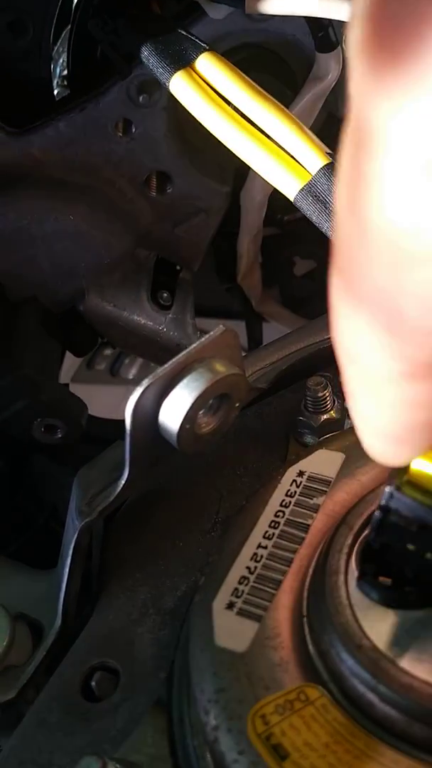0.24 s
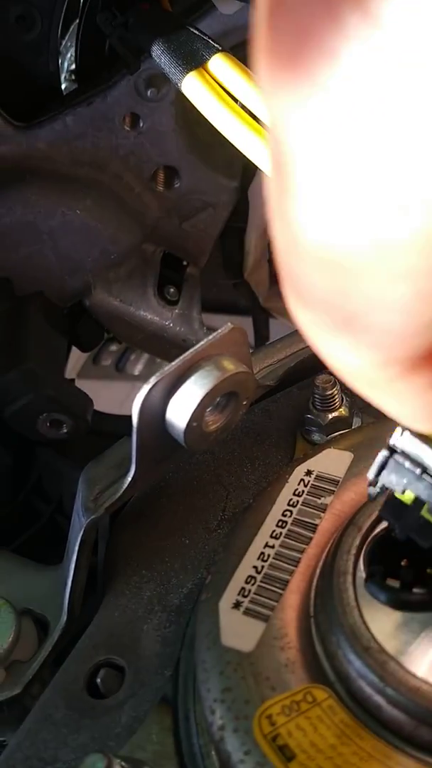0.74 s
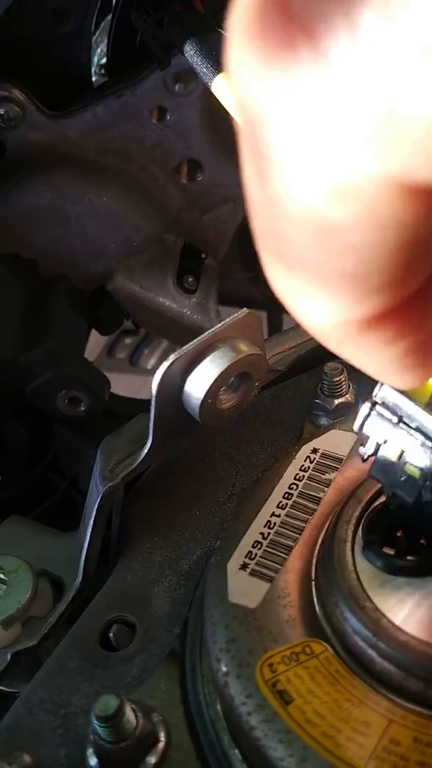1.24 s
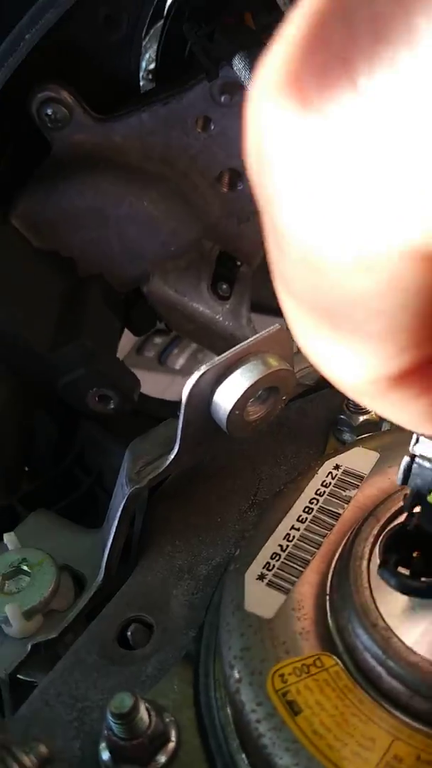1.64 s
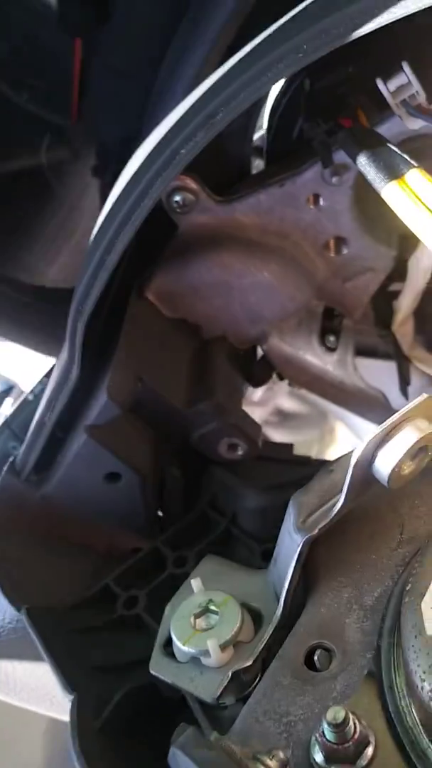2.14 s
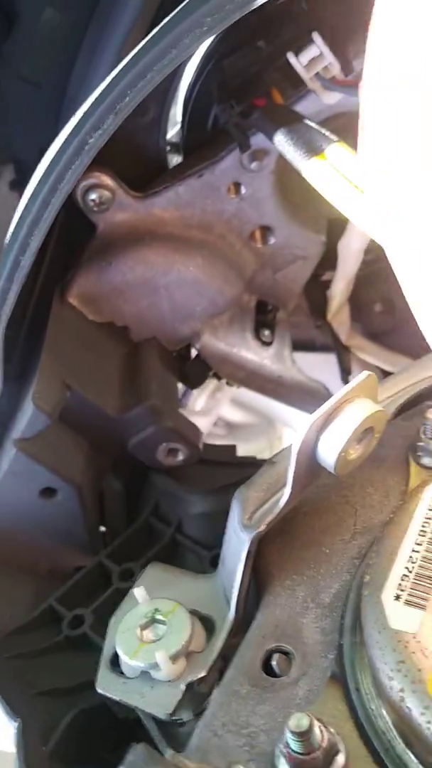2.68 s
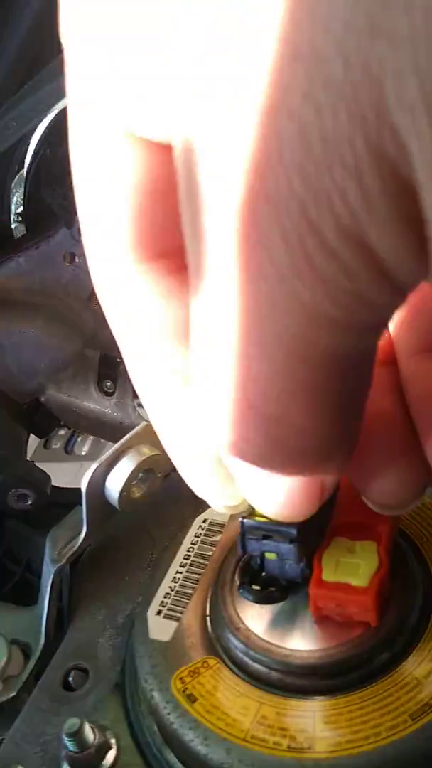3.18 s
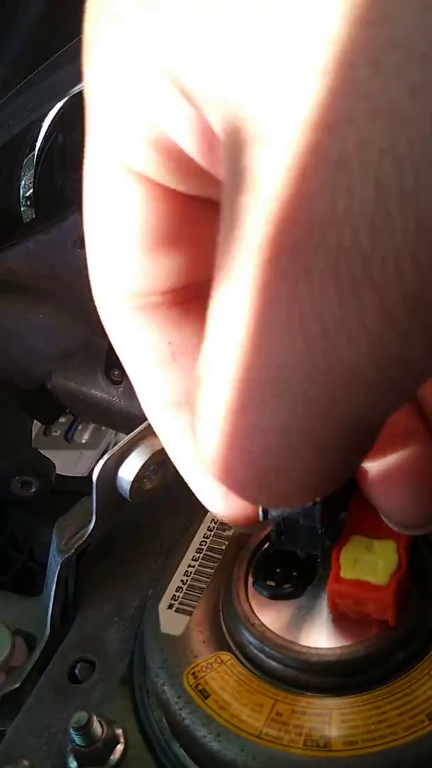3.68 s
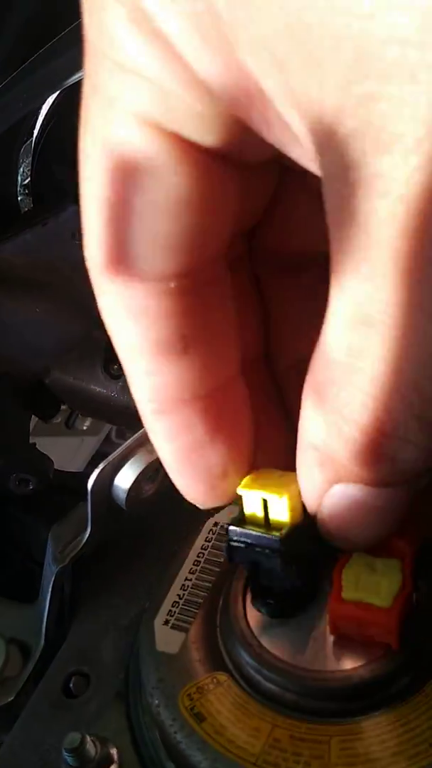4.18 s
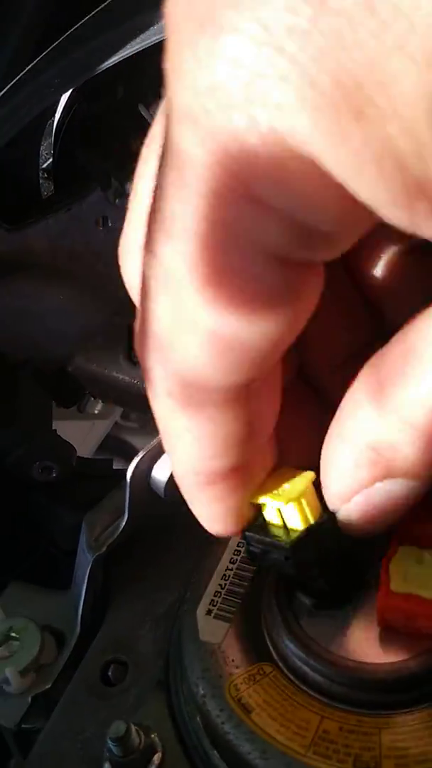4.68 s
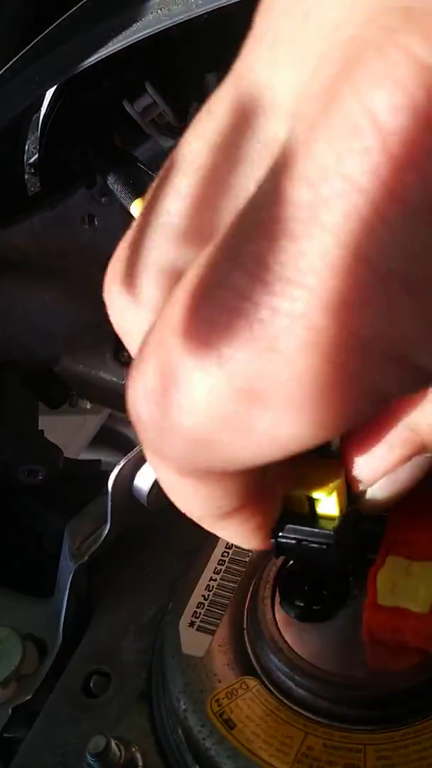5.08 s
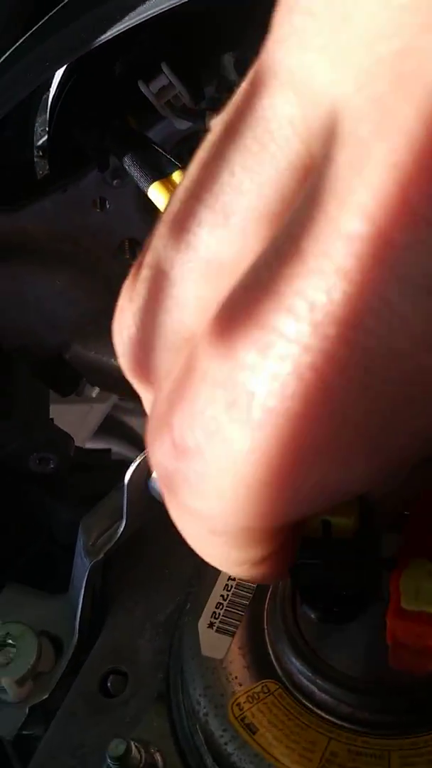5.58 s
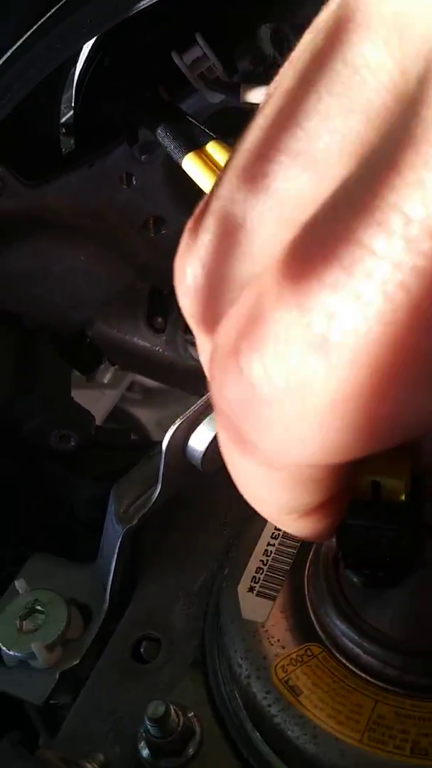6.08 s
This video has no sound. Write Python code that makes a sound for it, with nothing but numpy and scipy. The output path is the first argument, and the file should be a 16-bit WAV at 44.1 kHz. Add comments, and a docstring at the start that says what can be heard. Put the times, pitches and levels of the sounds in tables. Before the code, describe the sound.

In a still, padded car interior, small plugs are fitted by hand. Sparse bright ticks come first, then a busier cluster of clicks, dull knocks and dragging rustle, and later a crisp latch snapping home in two quick stages. Another strong click follows before the handling thins out. Close, dry pickup with a low room hush, a few faint distant chirps and a low engine drone swelling late.

```python
"""A hand fits small plastic plugs into the sockets of a steel housing in a parked car, close to the microphone.
Plugs tick as short bursts of slips that ring plastic shell and housing; a latch snaps home in two stages.
Wires knock as damped resonances; hand and cable sleeve rustle and squeak as shaped noise.
Behind them lie a few faint falling chirps (gliding sines), the quiet cabin (coloured noise)
and a far engine that swells near the end (narrow noise bands)."""
import sys
import numpy as np
from scipy import signal
from scipy.fft import rfft, irfft, next_fast_len
from scipy.io import wavfile

SR = 44100
rng = np.random.default_rng(int(sys.argv[2]) if len(sys.argv) > 2 else 0)


def materialize(psi):
    """Save the field psi as 16-bit PCM at rate SR to the path in sys.argv[1].

    A 1-D psi becomes a single channel; in a 2-D psi each row is a channel.
    """
    bounded = np.clip(np.atleast_2d(psi).T, -1, 1)
    quanta = np.round(bounded * 32767).astype(np.int16)
    wavfile.write(sys.argv[1], SR, quanta)


N = 279153   # samples
TIME = np.arange(N) / SR   # s
LOCAL = np.arange(-int(.04 * SR), int(.12 * SR)) / SR   # s around the zero moment of one blow
BLOW_SAMPLES = .004 * SR


def from_db(db):
    """Decibels to gain."""
    return 10 ** (np.asarray(db) / 20)


def rms_one(x):
    """Scale a steady sound to rms 1."""
    return x / np.sqrt(np.mean(x ** 2) + 1e-20)


def unit_blow(x):
    """Scale a blow to the energy of 4 ms at rms 1."""
    return x * np.sqrt(BLOW_SAMPLES / (np.sum(x ** 2) + 1e-20))


def coloured(x, spectrum):
    """Give a steady excitation a spectrum, joined up along log frequency; rms 1."""
    hz, db = np.transpose(spectrum)
    size = next_fast_len(len(x))
    grid = np.maximum(np.fft.rfftfreq(size, 1 / SR), 1)
    gain = from_db(np.interp(np.log(grid), np.log(hz), db))
    return rms_one(irfft(rfft(x, size) * gain, size)[:len(x)])


def resonance(x, hz, width_hz):
    """Two-pole resonance with gain 1 on top."""
    r = np.exp(-np.pi * width_hz / SR)
    feedback = [1, -2 * r * np.cos(2 * np.pi * hz / SR), r * r]
    return signal.lfilter(np.array([1, 0, -1]) * (1 - r * r) / 2, feedback, x)


def ring_width(t60):
    """Width in Hz of a resonance that dies away by 60 dB in t60 seconds."""
    return np.log(1000) / (np.pi * t60)


def bell(x, hz, width_hz, gain_db):
    """Raise or lower one band."""
    a = from_db(gain_db / 2)
    q = np.sin(np.pi * width_hz / SR)
    c = -2 * np.cos(2 * np.pi * hz / SR)
    return signal.lfilter([1 + q * a, c, 1 - q * a], [1 + q / a, c, 1 - q / a], x)


def drift(rate):
    """Random wander with rms 1, passing through `rate` new values a second."""
    knots = rng.standard_normal(N // 10)
    return rms_one(np.interp(TIME * rate, np.arange(len(knots)), knots))


def add(track, s, sound):
    """Lay a short sound into a track with its zero moment at s."""
    at = np.arange(len(sound)) + int(round((s + LOCAL[0]) * SR))
    inside = (at >= 0) & (at < N)
    track[at[inside]] += sound[inside]


def contact(rise_s, fall_s):
    """Force of a contact: it builds while the parts slide and collapses once they let go."""
    return np.exp(-np.abs(LOCAL) / np.where(LOCAL < 0, rise_s, fall_s))


def slips(size, spread_db):
    """Dense tiny slips of uneven size."""
    uneven = np.clip(rng.standard_normal(size), -2, 2)
    return rng.standard_normal(size) * from_db(spread_db * uneven)


# The more a slide damps the shell, the more of its scrape is heard.
CRACK_DB_PER_DOUBLING = 0.5

# Plug contacts. Each row: time in seconds, level in dB, housing share in dB, slide-in in seconds,
# main shell mode in Hz, second shell mode in Hz.
PLUG_CONTACTS = [ (0.0918, -43, -5, 0.0011, 5740, 7170), (0.1320, -52.5, -5.5, 0.0035, 6300, 10000),
                 (0.2210, -55.5, -4.5, 0.0015, 4670, 7450), (0.2256, -50, -9.5, .0012, 4900, 9070),
                 (0.4151, -57, 0.5, 0.0074, 3460, 7400), (0.7448, -47, -9.5, .0017, 6200, 7160),
                 (0.7560, -42, -16, .0034, 6400, 7140), (1.5950, -57.5, -5, 0.0025, 6570, 11000),
                 (2.0015, -50, -4, 0.0022, 8220, 8500), (2.1142, -33.5, -9.5, 0.0083, 6550, 8300),
                 (2.1215, -43, 0, 0.00069, 7260, 9500), (2.2, -52.5, 0.5, 0.0019, 7900, 8300),
                 (2.4077, -39, -4, 0.00052, 4050, 4800), (2.5196, -47, 1, 0.0023, 7960, 9100),
                 (2.8800, -45.5, -8, 0.0056, 6400, 8300), (2.981, -52, -6, .0014, 6300, 8800),
                 (3.091, -53.5, -11, 0.0016, 7340, 8800), (3.4223, -30, -19, 0.0013, 6200, 9060),
                 (3.7858, -50.5, -11, .0050, 8140, 9000), (3.9953, -54.5, -9, 0.0032, 6550, 8400),
                 (4.055, -55, -1.5, 0.0062, 7260, 8740), (4.164, -60, -5, .0012, 10000, 11100),
                 (4.217, -58, -5, .0070, 8300, 10500), (4.2845, -38, -11.5, 0.001, 7650, 8620),
                 (4.7290, -32, -16, 0.00086, 6300, 4950), (4.8933, -61, -3, .0010, 8900, 10200),
                 (5.118, -65, -18, .0011, 8400, 13000), (5.1994, -46, -15, 0.001, 7300, 8100)]

# Broadband crack of a plastic contact. Each row: frequency in Hz, relative level in dB per Hz.
CRACK_SPECTRUM = [(200, -11.5), (1000, -17), (2600, -20.5), (4300, -3), (5600, 3.5), (6600, 11),
                  (9000, 2.5), (12000, 3), (16000, -6.5)]


def plugs(fall_s, shell_width_hz, main_db, second_db, crack_db, damping_slide_s):
    """Each contact is a burst of slips: heard as a crack, as two plastic shell modes and through the housing."""
    out = np.zeros(N)
    for s, db, housing_db, slide_s, main_hz, second_hz in PLUG_CONTACTS + fumbles():
        force = contact(slide_s, fall_s) * coloured(slips(len(LOCAL), spread_db=5.0), CRACK_SPECTRUM)
        # a sudden snap rings freely; parts that slide stay in touch and damp each other
        damping = 1 + slide_s / damping_slide_s
        width_hz = damping * shell_width_hz
        main = from_db(main_db) * unit_blow(resonance(force, main_hz, width_hz))
        second = from_db(second_db) * unit_blow(resonance(force, second_hz, width_hz))
        scrape_db = CRACK_DB_PER_DOUBLING * np.log2(damping)
        crack = from_db(crack_db + scrape_db) * unit_blow(force)
        body = from_db(housing_db) * housing(force, damping)
        add(out, s, from_db(db) * (crack + main + second + body))
    return out


FUMBLE_PER_S = 13
FUMBLE_DB, FUMBLE_SPREAD_DB = -60, 10   # loudest tick, and how far below it others may fall
FUMBLE_HOUSING_DB, FUMBLE_SLIDE_S, FUMBLE_HZ = -12.5, 0.006, (8300, 10700)

# Spells when fingers feel for the socket and make faint ticks. Each row: start in seconds, end in seconds.
FUMBLE_SPELLS = [(3.68, 4.02)]


def fumbles():
    """Faint contacts at loose intervals while the fingers seat a plug, as rows like those of PLUG_CONTACTS."""
    rows = []
    for start, end in FUMBLE_SPELLS:
        for k, (late, weak) in enumerate(rng.random(size=(16, 2))):
            s = start + (k + late) / FUMBLE_PER_S
            db = FUMBLE_DB - FUMBLE_SPREAD_DB * weak
            if s < end:
                rows.append((s, db, FUMBLE_HOUSING_DB, FUMBLE_SLIDE_S, *FUMBLE_HZ))
    return rows


# Steel housing with its sockets. Each row: mode in Hz, level in dB, t60 in seconds at damping 1.
HOUSING_MODES = [(350, -8, .03), (520, -6, .06), (630, -5, .05), (746, -4.5, .045), (1125, 0, .08),
                 (1295, -6, .034), (1467, 1, .027), (1645, 3, .055), (1810, 0, .045), (1970, -3, .03),
                 (2234, -9, .03), (2550, -8, .029), (3010, -12, .018)]


def housing(force, damping):
    """Every mode of the housing rings on after the force has gone; the heavy steel passes little treble."""
    modes = 0
    for hz, db, t60 in HOUSING_MODES:
        modes = modes + from_db(db) * unit_blow(resonance(force, hz, damping * ring_width(t60)))
    treble_cut = signal.butter(4, 3300, fs=SR, output="sos")
    return unit_blow(signal.sosfilt(treble_cut, modes))


# The latch rides over its catch and snaps home.
# Each row: time in seconds, level in dB, housing share in dB.
LATCH_SNAPS = [(4.0606, -32, -2.5), (4.0623, -30, -8), (4.0683, -31.5, 0.5), (4.0704, -29.5, -10.5)]

# The sprung latch. Each row: mode in Hz, level in dB, t60 in seconds.
LATCH_MODES = [(6200, -2, .03), (7200, 2, 0.037), (7500, 7, 0.026), (8200, -3, 0.031), (7900, -5, 0.024),
               (8300, -15, .04), (8870, -10, 0.031), (8800, -4, 0.025), (9300, -14, .04), (9550, -11, .04),
               (10200, -1, .045), (10200, -16, .04), (12400, -4, 0.032), (13200, -5, 0.036)]

# Crack of its snap. Each row: frequency in Hz, relative level in dB per Hz.
SNAP_SPECTRUM = [(200, -23), (1000, -13), (2600, -10.5), (4200, -14), (5500, -7), (6800, 2), (9000, -5),
                 (12500, -11), (16000, -12)]


def latch(rise_s, fall_s, ring_db, crack_db):
    """Each stage of the snap cracks, rings the latch and jolts the housing."""
    out = np.zeros(N)
    for s, db, housing_db in LATCH_SNAPS:
        force = contact(rise_s, fall_s) * coloured(slips(len(LOCAL), spread_db=2.0), SNAP_SPECTRUM)
        modes = 0
        for hz, mode_db, t60 in LATCH_MODES:
            modes = modes + from_db(mode_db) * unit_blow(resonance(force, hz, ring_width(t60)))
        crack = from_db(crack_db) * unit_blow(force)
        ring = from_db(ring_db) * unit_blow(modes)
        body = from_db(housing_db) * housing(force, damping=0.98)
        add(out, s, from_db(db) * (crack + ring + body))
    return out


# Dull knocks of hand and wires on the trim.
# Each row: time in seconds, level in dB, centre in Hz, width in Hz of the first of two resonances.
TRIM_KNOCKS = [ (1.3830, -59.5, 2700, 1190), (2.212, -45, 328, 350), (2.244, -46.5, 298, 300),
               (2.407, -34.5, 940, 990), (2.519, -41, 624, 295)]


def knocks(rise_s, fall_s, rattle, skirt):
    """A soft push with a little rattle sets one damped panel mode going; the soft contact narrows its skirts."""
    out = np.zeros(N)
    for s, db, hz, width_hz in TRIM_KNOCKS:
        push = LOCAL == 0
        force = push + rattle * contact(rise_s, fall_s) * rng.standard_normal(len(LOCAL))
        panel = resonance(force, hz, width_hz)
        add(out, s, from_db(db) * unit_blow(resonance(panel, hz, skirt * width_hz)))
    return out


def reflections(x, near_db, near_t60, far_db, far_t60):
    """Dense early echoes from hand and housing, then the short tail of the padded cabin."""
    t = LOCAL[LOCAL > 0]
    response = np.zeros(len(t))
    for db, t60 in [(near_db, near_t60), (far_db, far_t60)]:
        echoes = rng.standard_normal(len(t)) * np.exp(-np.log(1000) * t / t60) * (t > .0008)
        response += from_db(db) * echoes / np.linalg.norm(echoes)
    response[0] = 1   # direct sound
    return signal.fftconvolve(x, response)[:N]


STROKE_ATTACK_S, STROKE_RELEASE_S = 0.092, 0.047


def stroke(start, end):
    """Pressure of one stroke: it builds smoothly, holds and lets go."""
    before = np.maximum(start - TIME, 0) / STROKE_ATTACK_S
    after = np.maximum(TIME - end, 0) / STROKE_RELEASE_S
    return np.exp(-before ** 2 - after ** 2)


# Strokes of the hand along the cable sleeve.
# Each row: start of the hold in seconds, its end in seconds, firm rub in dB, light brush in dB.
SLEEVE_STROKES = [(2.247, 2.385, -53, -66), (2.455, 2.59, -60.5, -60), (2.64, 2.93, -67.5, -66),
                  (2.98, 3.155, -62, -59)]

# Colour of the firm rub. Each row: frequency in Hz, relative level in dB per Hz.
RUB_SPECTRUM = [(60, -19), (130, 5.5), (300, -0.5), (800, -4), (1500, -5), (2300, -10), (3000, -1.5),
                (3600, -8.5), (6000, -3.5), (9000, -10), (12000, -17), (16000, -13)]

# Colour of the light brush. Each row: frequency in Hz, relative level in dB per Hz.
BRUSH_SPECTRUM = [(100, -7), (600, 11), (1500, -8), (3700, -23), (4250, 7.5), (4600, -4), (5000, 7),
                  (5500, -14), (8500, 1), (11200, 6), (13500, -4), (16000, -9)]


def rustle(grain_db, uneven_db):
    """Skin drags over the sleeve in fine slips, under a pressure that wavers."""
    firm = np.max([from_db(db) * stroke(start, end) for start, end, db, _ in SLEEVE_STROKES], axis=0)
    light = np.max([from_db(db) * stroke(start, end) for start, end, _, db in SLEEVE_STROKES], axis=0)
    rub = firm * coloured(slips(N, grain_db), RUB_SPECTRUM)
    brush = light * coloured(slips(N, grain_db), BRUSH_SPECTRUM)
    return (rub + brush) * from_db(uneven_db * drift(90))


# Sleeve and fingertips singing briefly as they slide. Each row: peak time in seconds, level in dB,
# half length in seconds, centre in Hz, width in Hz of the first of two resonances.
SLEEVE_SQUEAKS = [ (2.262, -64, 0.034, 2840, 300), (2.368, -57, 0.052, 2980, 250),
                  (3.100, -75, 0.2, 4360, 170), (3.070, -80, .11, 4900, 170),
                  (4.660, -66.5, 0.046, 4620, 450), (5.625, -80, 0.063, 2740, 120)]


def squeaks():
    """Friction noise feeds one narrow resonance, which swells and fades around each squeak's own peak time."""
    out = np.zeros(N)
    for s, db, half_s, hz, width_hz in SLEEVE_SQUEAKS:
        narrow = resonance(rng.standard_normal(N), hz, width_hz)
        tone = rms_one(resonance(narrow, hz, 2 * width_hz))
        swell = np.exp(-((TIME - s) / half_s) ** 2)
        out += from_db(db) * swell * tone
    return out


# Far chirps. Each row: start in seconds, level in dB.
FAR_CHIRPS = [(1.594, -64.5), (1.765, -62), (1.949, -62.5), (2.135, -62)]


def chirps(start_hz, end_hz, length_s, blur_hz):
    """Faint falling chirps, perhaps a bird outside: gliding sines blurred by their way in."""
    out = np.zeros(N)
    for s, db in FAR_CHIRPS:
        progress = np.clip((TIME - s) / length_s, 0, 1)
        phase = 2 * np.pi * np.cumsum(start_hz + (end_hz - start_hz) * progress) / SR
        swell = np.sqrt(np.abs(np.sin(np.pi * progress)))
        out += from_db(db) * swell * drift(blur_hz) * np.sin(phase)
    return out


# The engine running far off swells to its full level and stays there.
DRONE_QUIET_DB, DRONE_FULL_DB = -92, -68.5
DRONE_FULL_AT_S, DRONE_SWELL_DB_PER_S = 5.92, 16

# Orders of the far engine. Each row: multiple of the shaft speed, relative level in dB.
ENGINE_ORDERS = [(2, -15), (3, -17.5), (4, -17), (5, -3.5), (6, -6)]


def drone(shaft_hz, waver_hz):
    """Low orders come through the body shell and swell late; narrow noise bands make them waver."""
    to_go_s = np.maximum(DRONE_FULL_AT_S - TIME, 0)
    level_db = np.maximum(DRONE_QUIET_DB, DRONE_FULL_DB - DRONE_SWELL_DB_PER_S * to_go_s)
    orders = np.zeros(N)
    for k, db in ENGINE_ORDERS:
        band = resonance(rng.standard_normal(N), k * shaft_hz, waver_hz)
        orders += from_db(db) * rms_one(resonance(band, k * shaft_hz, waver_hz))
    return from_db(level_db) * orders


CABIN_DB = -62.5

# Still cabin. Each row: frequency in Hz, relative level in dB per Hz.
CABIN_SPECTRUM = [(20, -54), (35, -30), (55, -12.5), (75, -11), (100, 0), (140, -8), (195, 2), (250, -7),
                  (340, -4.5), (430, -10), (620, -5), (890, -12.5), (1130, -12), (1450, -13), (2500, -16.5),
                  (5000, -16), (6500, -18.5), (8500, -17.5), (11500, -24), (16000, -22)]


def cabin():
    """Steady hush of the parked car: coloured noise, strongest in the lows."""
    return from_db(CABIN_DB) * coloured(rng.standard_normal(N), CABIN_SPECTRUM)


def scene():
    """All the handling happens at one spot; both channels carry the same sound."""
    handling = plugs(fall_s=0.0017, shell_width_hz=117, main_db=-4.5, second_db=-10.0,
                     crack_db=-5, damping_slide_s=0.0013)
    handling = handling + latch(rise_s=0.00067, fall_s=0.0013, ring_db=-3.0, crack_db=-1.0)
    handling = handling + knocks(rise_s=0.0015, fall_s=0.0031, rattle=0.08, skirt=1.9)
    near = reflections(handling, near_db=-6, near_t60=0.04, far_db=-16.5, far_t60=0.08)
    sleeve = rustle(grain_db=2.0, uneven_db=1.55) + squeaks()
    far = chirps(start_hz=3170, end_hz=2430, length_s=.08, blur_hz=748)
    far = far + drone(shaft_hz=30.44, waver_hz=8.0) + cabin()
    return np.tile(near + sleeve + far, (2, 1))


def record(dry):
    """The microphone port rings near 9 kHz with a hollow below it; the top is cut."""
    x = bell(dry, hz=6560, width_hz=2940, gain_db=-8)
    x = bell(x, hz=8510, width_hz=1920, gain_db=10)
    x = bell(x, hz=9520, width_hz=2000, gain_db=5.5)
    top_cut = signal.ellip(12, .2, 80, 15750, fs=SR, output="sos")   # steep, from 15750 Hz
    return signal.sosfilt(top_cut, x)


dry = scene()
out = record(dry)
materialize(out)
```